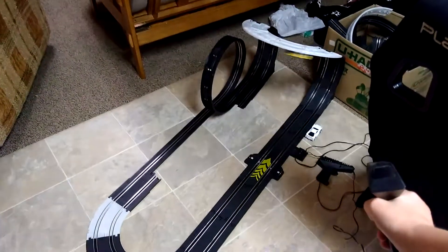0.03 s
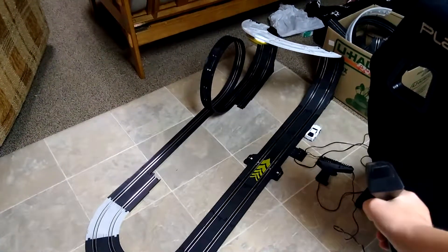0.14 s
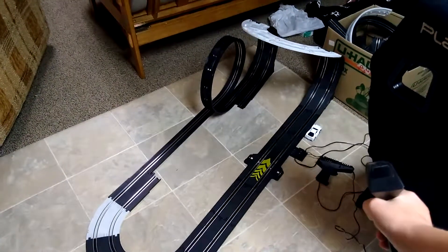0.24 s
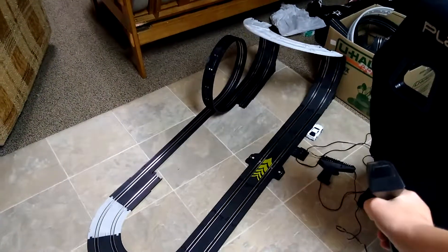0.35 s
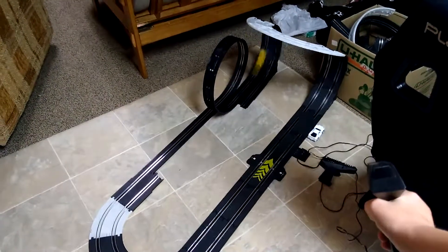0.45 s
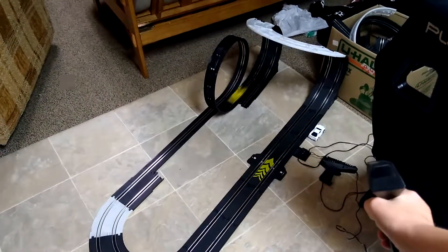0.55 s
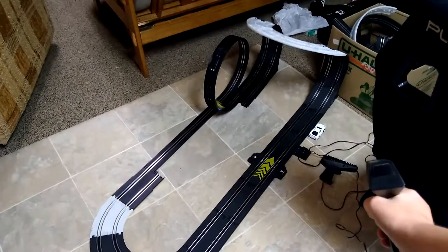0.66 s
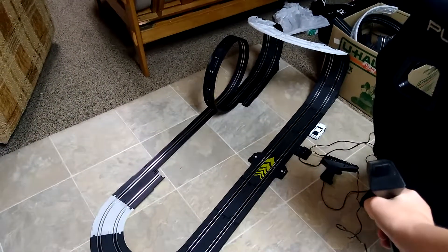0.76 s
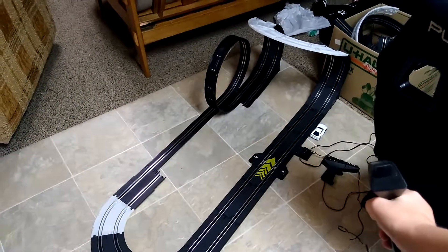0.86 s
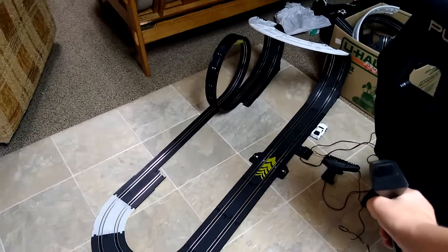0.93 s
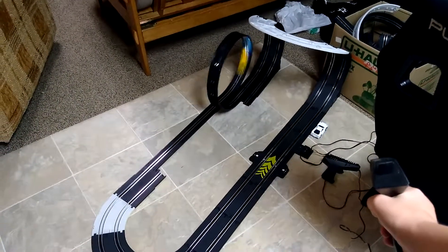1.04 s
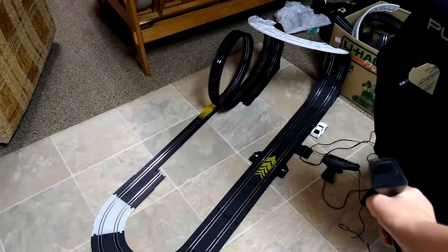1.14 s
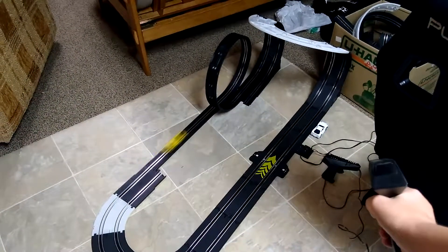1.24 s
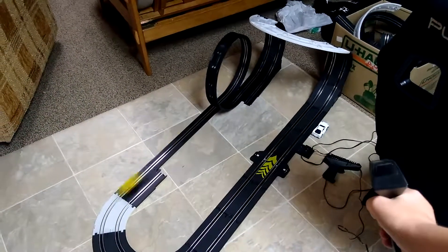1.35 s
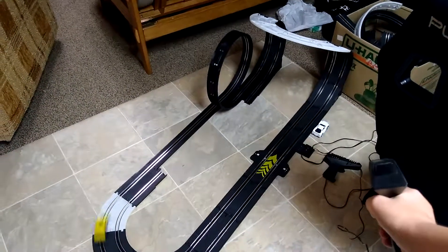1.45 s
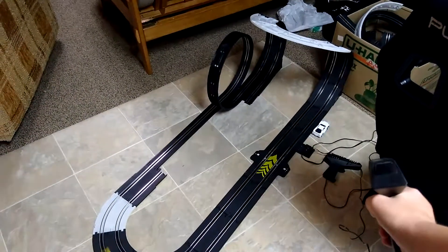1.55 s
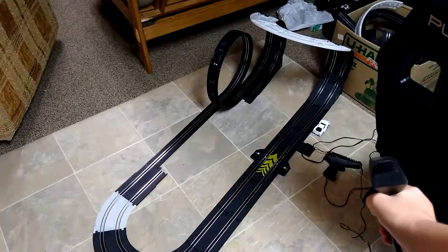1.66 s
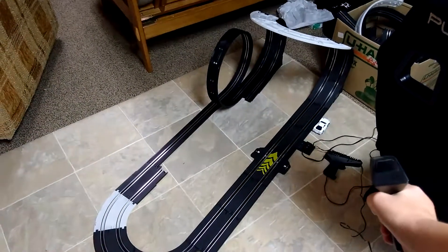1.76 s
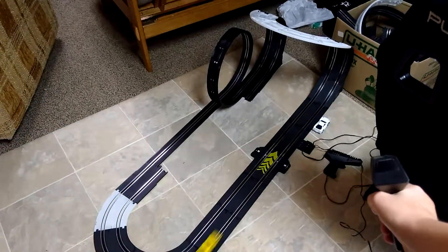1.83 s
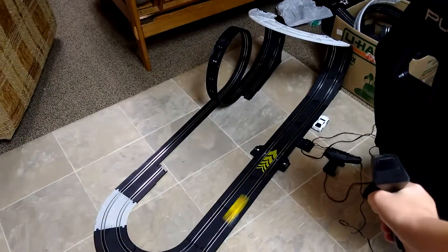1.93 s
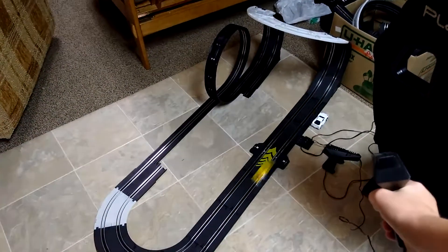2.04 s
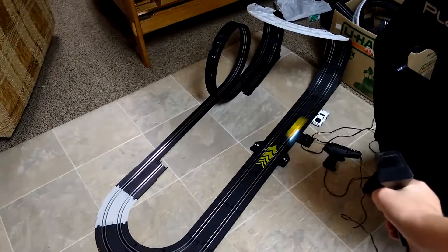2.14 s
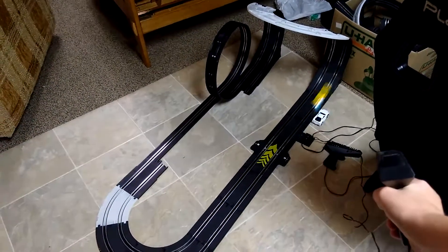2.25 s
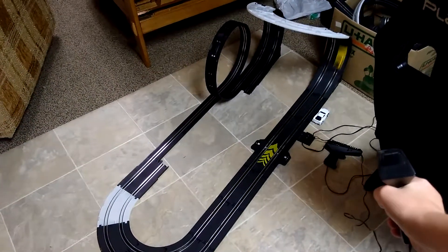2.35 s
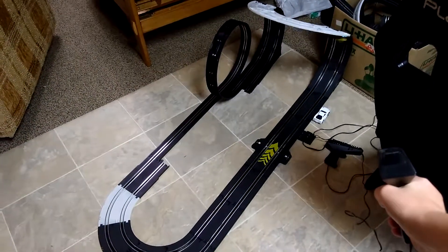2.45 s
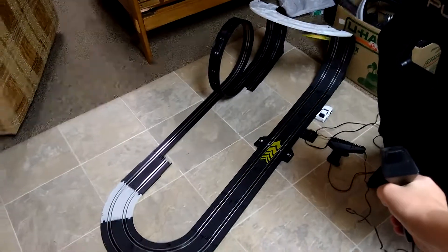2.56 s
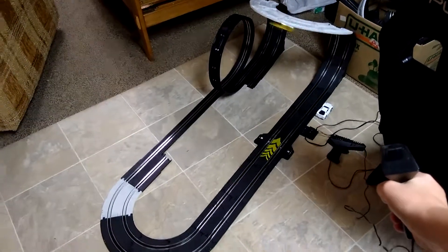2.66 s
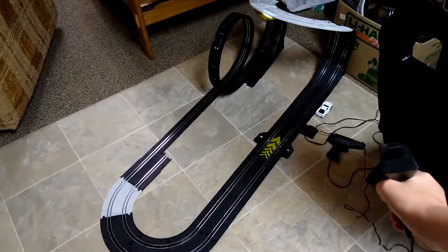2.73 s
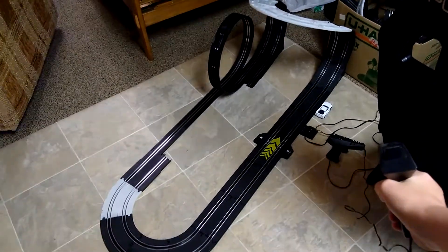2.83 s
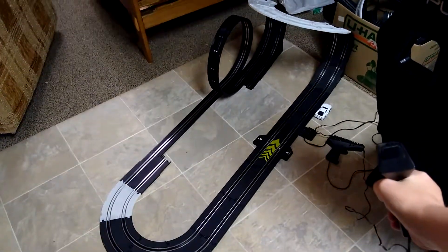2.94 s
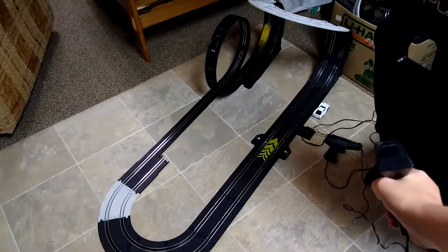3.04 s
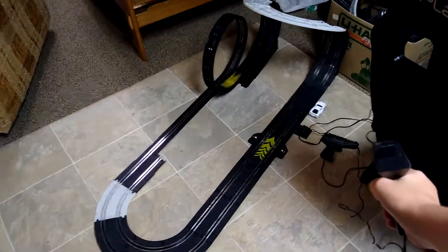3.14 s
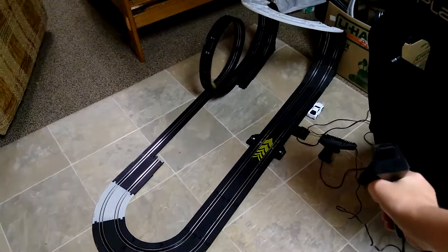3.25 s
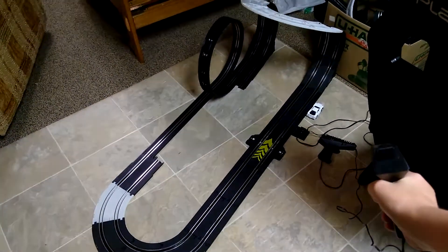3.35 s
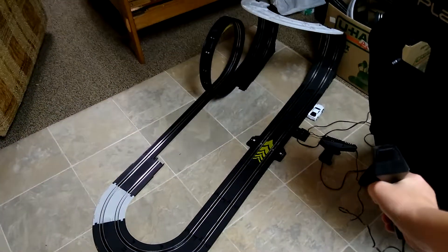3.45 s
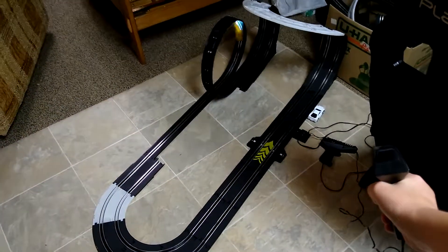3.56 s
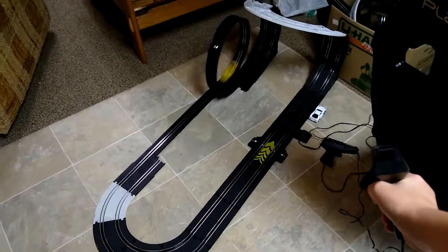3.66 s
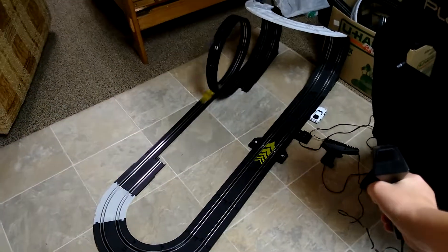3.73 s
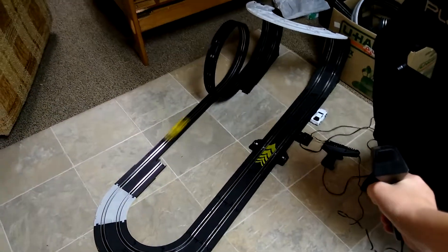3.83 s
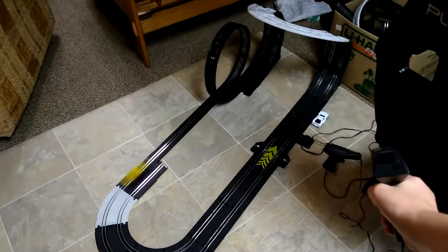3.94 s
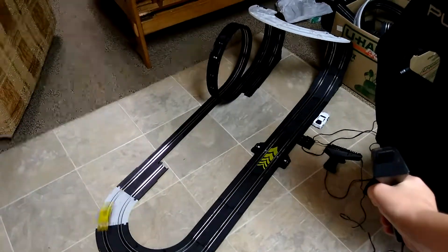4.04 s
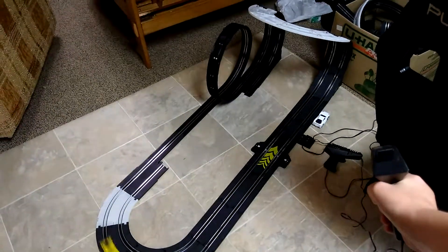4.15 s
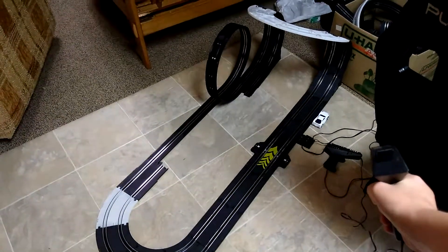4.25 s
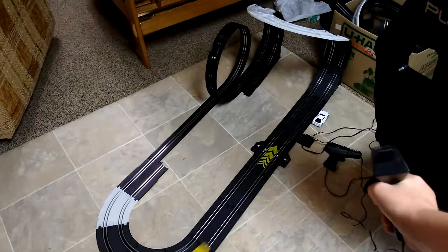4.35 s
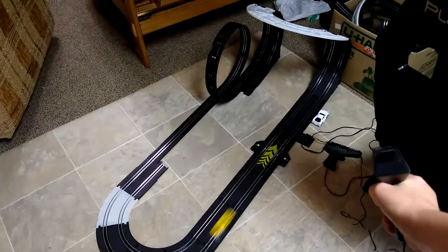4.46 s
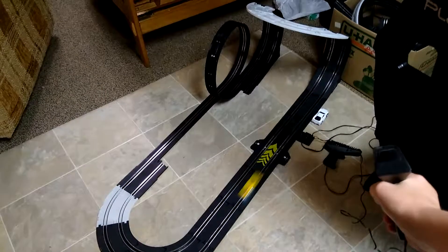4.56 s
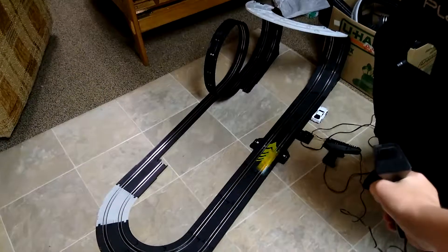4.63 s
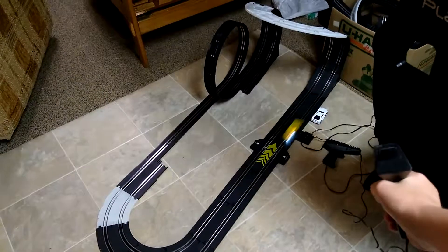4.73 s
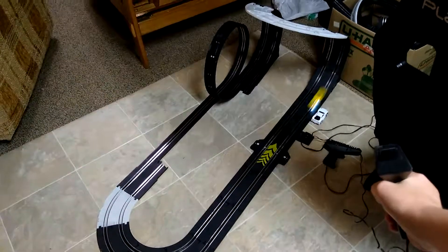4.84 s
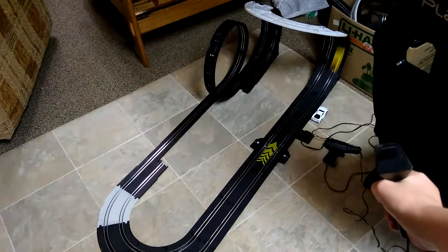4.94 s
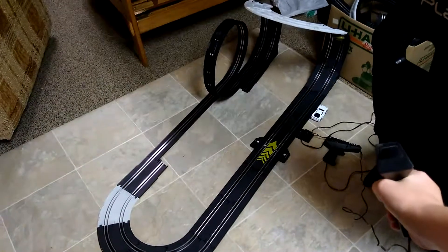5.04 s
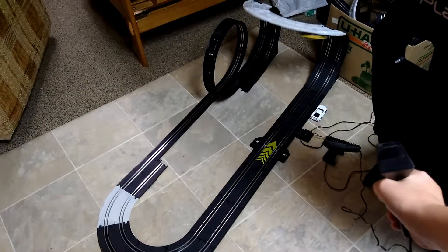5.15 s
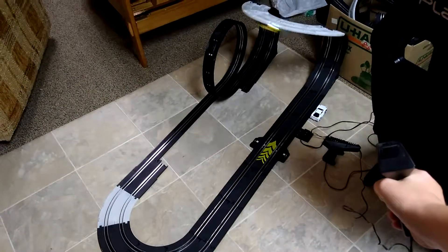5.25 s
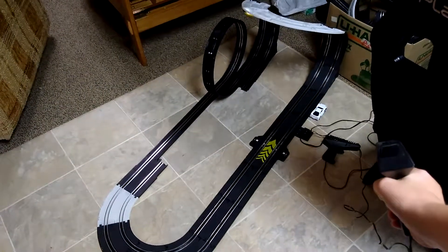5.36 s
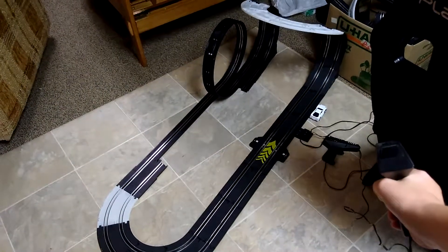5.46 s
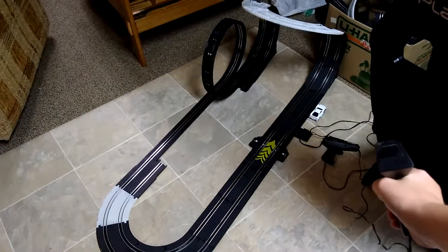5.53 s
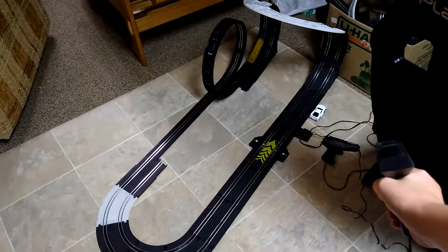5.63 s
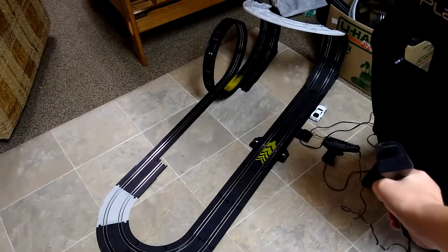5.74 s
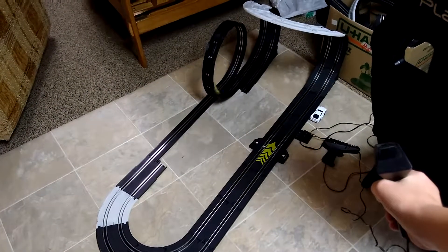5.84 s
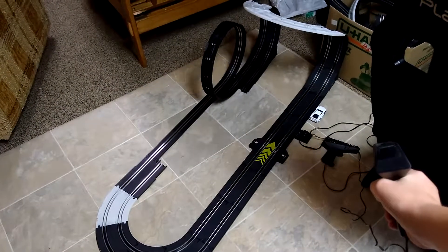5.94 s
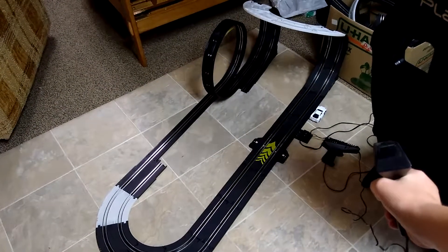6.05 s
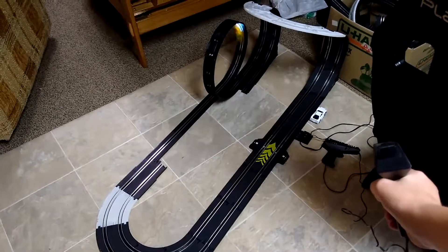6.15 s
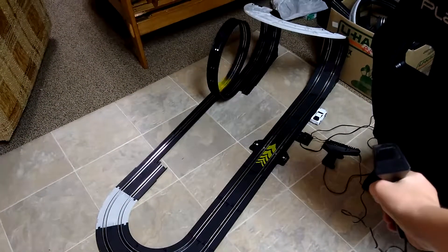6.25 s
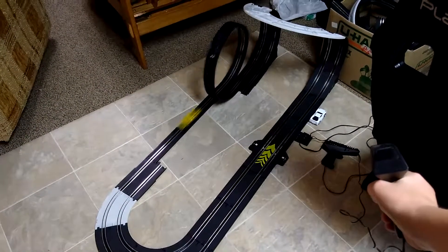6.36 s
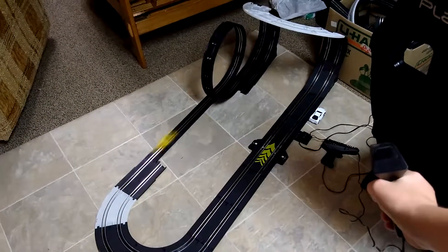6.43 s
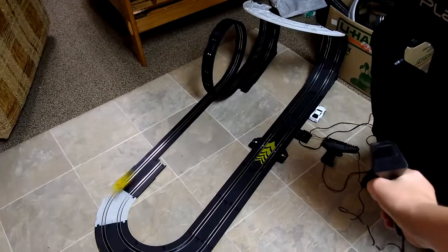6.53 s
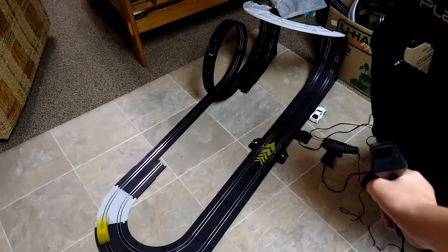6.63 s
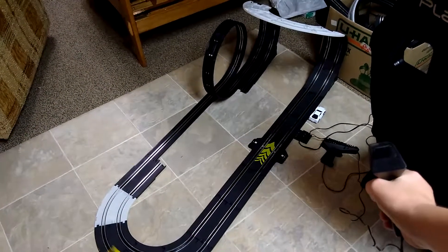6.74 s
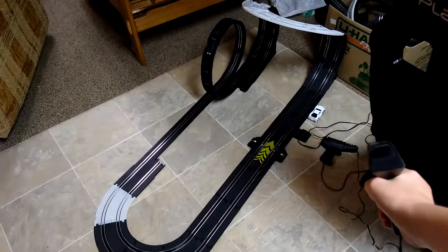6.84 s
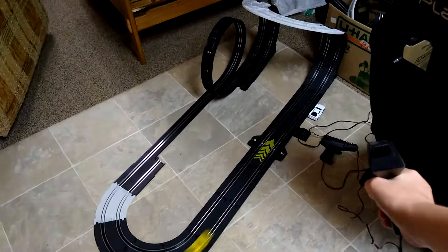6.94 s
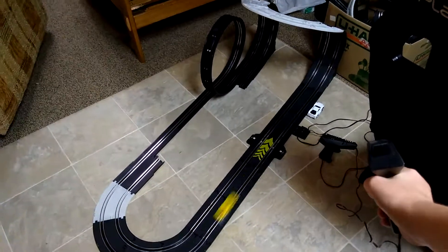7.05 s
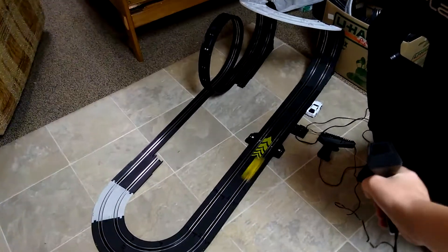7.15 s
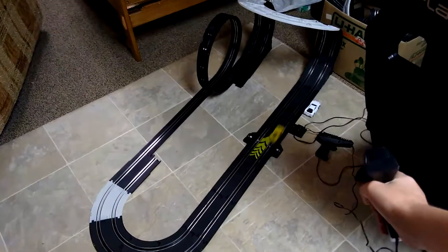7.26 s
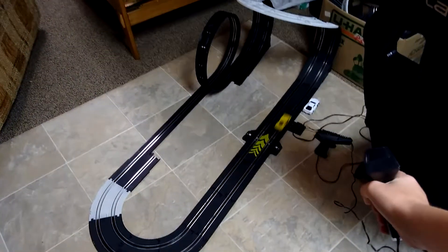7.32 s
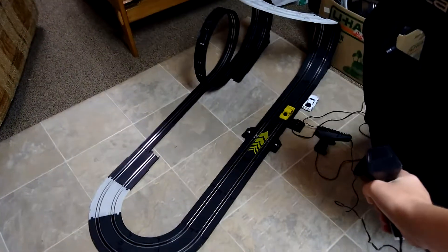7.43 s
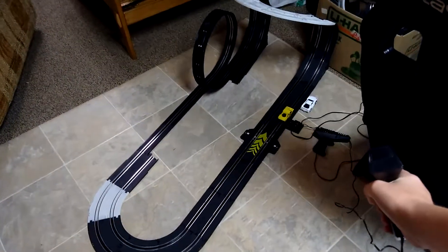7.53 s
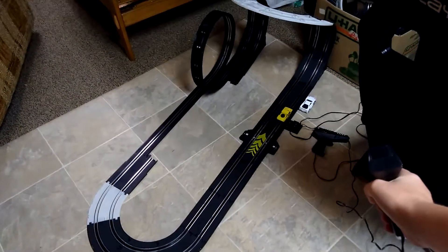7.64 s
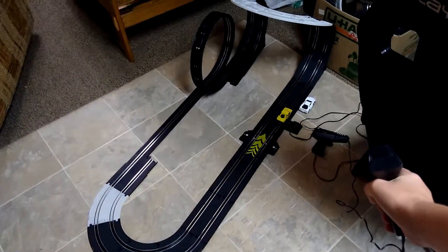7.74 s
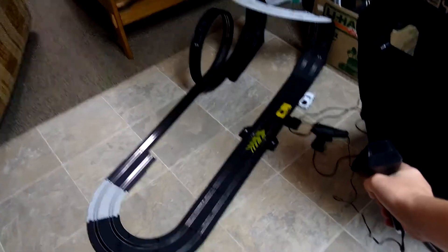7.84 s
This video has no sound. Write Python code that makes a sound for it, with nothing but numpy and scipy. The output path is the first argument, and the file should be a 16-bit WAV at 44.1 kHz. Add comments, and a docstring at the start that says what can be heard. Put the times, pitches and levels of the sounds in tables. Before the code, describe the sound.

Close, wide stereo in a small hard room: a toy car's wheels chatter over plastic track, with buzzing shell, gritty hiss and a thin motor tone. Clusters of dry knocks come and go each lap, getting deeper and fuller as the car nears. Every two and a half seconds it slaps a near piece with a bright clack and scrape. After the third slap the motor sags and everything falls to low hum and soft murmur.

```python
"""In a small tiled room, a toy slot car laps a plastic track close by.
Friction noise drives the resonances of track, chassis and shell; damped tones are the knocks on the joints.
The motor whines, and pick-up braids hiss on the rails as coloured noise. Once a lap the car slaps a
piece close by; at last it coasts to rest. The room answers with decaying noise and hums; in the stereo
picture, left and right differ in phase and level with frequency."""
import sys
import numpy as np
from scipy import signal
from scipy.fft import rfft, irfft, next_fast_len
from scipy.io import wavfile
from scipy.ndimage import uniform_filter1d, map_coordinates

SR = 44100
rng = np.random.default_rng(int(sys.argv[2]) if len(sys.argv) > 2 else 0)


def dump(signal):
    """Clip the signal to [-1, 1] and save it as 16-bit WAV at the path in sys.argv[1]."""
    limited = np.clip(np.atleast_2d(signal).T, -1, 1)
    pcm = np.round(limited * 32767).astype(np.int16)
    wavfile.write(sys.argv[1], SR, pcm)


N = 347949


def car():
    """Structure-borne excitation: one rolling contact shakes track, frame, shell and braids together."""
    flat, raised, chassis, body = shaking()
    piece_hz = per_lap(PIECE_PITCH)[0].clip(500)
    panel_hz = per_lap(PANEL_PITCH)[0].clip(2000)
    chatter = amp(0.57 * wobble(22) + 2.3 * wobble(110) + 1.1 * wobble(400))  # loose wheels
    out = track_rattle(flat, raised, chatter, piece_hz) + frame_grind(chassis, body, chatter)
    out += shell_buzz(body, chatter, panel_hz) + braid_hiss(body, chatter)
    return out + joint_knocks(raised, piece_hz) + shell_ticks(body, panel_hz)


# How each stretch of track shakes the parts, alike every lap, before the offsets below:
# lap_time_s, flat_pieces_db, raised_pieces_db, chassis_db, car_body_db
TRACK_LEVELS = [(.0, -41.5, -42.5, -31.5, -32), (.04, -53.5, -49, -60, -49.5), (.11, -47, -58, -55, -50),
                (.17, -48.5, -39, -53.5, -54), (.2, -44, -41, -52.5, -47), (.44, -52, -42, -55.5, -52.5),
                (.555, -57.5, -48, -69, -58.5), (.595, -51, -45, -55, -52.5), (.68, -56, -43, -64, -55),
                (.86, -53.5, -43, -64, -53.5), (.92, -45, -34, -48, -48), (1.04, -38, -34, -44, -49),
                (1.11, -41, -34, -55, -40), (1.23, -41.5, -40.5, -52, -40.5),
                (1.36, -45.5, -43, -52.5, -43), (1.47, -46, -47.5, -55, -40),
                (1.53, -39, -42, -48.5, -34.5), (1.65, -38.5, -40.5, -43.5, -41),
                (1.78, -42, -39.5, -52.5, -41.5), (1.87, -36.5, -38, -43.5, -46.5),
                (1.96, -41.5, -45.5, -46, -40.5), (2.05, -38.5, -50, -51, -49),
                (2.18, -41, -48, -48.5, -52.5), (2.245, -34.5, -46, -43.5, -46),
                (2.33, -41.5, -39, -47.5, -46), (2.42, -39, -36, -42.5, -57.5),
                (2.5, -35.5, -42, -40.5, -51), (2.565, -33.5, -35.5, -44, -51)]
# Departure from the usual lap: time_s, track_and_chassis_offset_db, car_body_offset_db
DRIVE_OFFSETS = [(0, 3, 0), (.4, -5, -0.5), (.8, -2.5, -1), (1.2, -1.5, 0.5), (1.6, 0.5, 0),
                 (2.0, -2, -8.5), (2.4, -6.5, -5.5), (2.8, -3.5, -1.5), (3.2, -6.5, -2), (3.6, -2, 1),
                 (4.0, -0.5, 1), (4.4, 0, -1.5), (4.8, -2.5, -6), (5.2, -0.5, -1), (5.6, -3, 0.5),
                 (6.0, -6, -1.5), (6.4, -3.5, -1.5), (6.8, 0, -1), (7.2, -1.5, -1.5)]
STOP_S, STOP_DB_PER_S = 7.24, 265  # the car coasts to rest: start, fall in level


def shaking():
    """Position-dependent excitation: levels in dB of flat pieces, raised pieces, chassis and car body."""
    flat, raised, chassis, body = per_lap(TRACK_LEVELS)
    s, track_db, body_db = np.transpose(DRIVE_OFFSETS)
    t = np.arange(N) / SR
    rest = -STOP_DB_PER_S * (t - STOP_S).clip(0)
    track_db = np.interp(t, s, track_db) + rest
    body_db = np.interp(t, s, body_db) + rest
    return flat + track_db, raised + track_db, chassis + track_db, body + body_db


# Resonances of flat and of raised track pieces: pitch_hz, width_hz, level_db
FLAT_MODES = [(429, 63, -6), (548.7, 42, -0.5), (634, 40, -1), (701.5, 13, -4.5), (756, 51, -6.5)]
RAISED_MODES = [(718, 33, -5.5), (806, 30, -3.5), (853, 44, -3), (920, 82, -10), (1058, 34, -6.5),
                (1202, 46, -1.5), (1280, 69, -5), (1386, 83, 0)]
# Pitch of the raised piece under the car: lap_time_s, pitch_hz
PIECE_PITCH = [(.07, 1140), (.25, 1000), (.8, 894), (.87, 1060), (1.2, 1035), (1.29, 967), (1.45, 1130),
               (1.9, 1203), (1.99, 767), (2.4, 733)]


def track_rattle(flat, raised, chatter, piece_hz):
    """Forced plate vibration: wheels excite the track's modes, in raised pieces mostly near their pitch."""
    rattle = rolled(amp(flat - 4.0), FLAT_MODES, chatter, own_db=3.5)
    return rattle + rolled(amp(raised - 3), RAISED_MODES, chatter, own_db=2, focus_hz=piece_hz, spread=0.24)


# Resonances of the chassis and of the axles: pitch_hz, width_hz, level_db
CHASSIS_MODES = [(1365, 87, -0.61), (1498, 44, 0.12), (1603, 35, -0.32), (1744, 63, 1.7), (1998, 130, 1)]
AXLE_MODES = [(2110, 110, -9), (2350, 120, -6.5), (2560, 130, -7), (2750, 130, -9)]
AXLE_BODY_DB, AXLE_FRAME_DB = -4, -5  # axle drive relative to car body and to chassis


def frame_grind(chassis, body, chatter):
    """Coupled vibration: the axles grind with body and chassis, whose incoherent powers add."""
    axle_force = np.hypot(amp(body + AXLE_BODY_DB), amp(chassis + AXLE_FRAME_DB))
    frame = rolled(amp(chassis), CHASSIS_MODES, chatter, own_db=3)
    return frame + rolled(axle_force, AXLE_MODES, chatter, own_db=3)


# Resonances of the shell: pitch_hz, width_hz, level_db
SHELL_MODES = [(2893, 46, -4.5), (3093, 66, -11), (3420, 144, -5), (3724, 260, -10.5), (4160, 91, -9.5),
               (4517, 120, -3)]
# Pitch of the part of the shell that buzzes most: lap_time_s, pitch_hz
PANEL_PITCH = [(.1, 3446), (.6, 3580), (.7, 4150), (.86, 3392), (1.2, 3320), (1.7, 3524), (2.02, 4250),
               (2.17, 3780), (2.28, 4440), (2.36, 4400), (2.43, 3170)]


def shell_buzz(body, chatter, panel_hz):
    """Panel resonance: the modes nearest the most active part of the shell respond most."""
    return rolled(amp(body + 2.5), SHELL_MODES, chatter, own_db=3.5, focus_hz=panel_hz, spread=0.17)


# Spectrum of the braids on the rails: frequency_hz, density_db (per Hz)
BRAID_SPECTRUM = [(2500, -13), (4500, -24.5), (5200, 1), (6500, 0.5), (8500, 3.5), (11000, 4), (13000, 4),
                  (15400, -4), (15650, -17.5)]
SKID_DB, SKID_S = -35.5, 0.094  # hiss after each slap; its envelope's decay reaches 34 dB after this time


def braid_hiss(body, chatter):
    """Sliding friction: broadband noise follows the car body and flares after each slap."""
    skid = after_slaps(lambda t: amp(SKID_DB - 34 * (t / SKID_S) ** 2) * (t / 0.015).clip(0, 1))
    friction = unit(chatter ** 0.5 * amp(2.03 * wobble(45)) * rng.standard_normal(N))
    return coloured((amp(body + 2.5) + skid) * friction, BRAID_SPECTRUM)


# Knocks on joints, levels before each part's offset: start_s, level_db, pitch_hz
JOINT_KNOCKS = [(0.19, -27, 952), (0.368, -32.5, 810), (0.395, -26, 1240), (0.453, -26, 854),
                (0.482, -27.5, 1280), (0.505, -19.5, 1055), (0.533, -21.5, 1068), (0.571, -21, 1070),
                (0.596, -37, 1140), (0.692, -30, 820), (0.992, -26, 1204), (1.012, -28, 1186),
                (1.063, -25.5, 1090), (1.076, -26, 604), (1.088, -26.5, 1255), (1.119, -19.5, 625),
                (1.222, -28.5, 1217), (1.244, -27.5, 1270), (1.264, -17.5, 570), (1.299, -29, 1266),
                (1.326, -24, 1198), (1.363, -30.5, 1310), (1.405, -20, 536), (1.471, -23.5, 652),
                (1.503, -28.5, 654), (1.524, -30, 700), (1.553, -32, 640), (1.604, -28.5, 575),
                (1.64, -25, 683), (1.727, -21.5, 598), (1.747, -22.5, 627), (1.806, -27.5, 1504),
                (1.944, -26, 564), (2.006, -23.5, 565), (2.035, -20.5, 558), (2.052, -23.5, 533),
                (2.254, -27, 785), (2.307, -37, 1124), (2.663, -29.5, 1026), (2.693, -33, 1017),
                (2.745, -33, 1010), (2.977, -27.5, 1007), (2.992, -28.5, 1010), (3.007, -36, 1120),
                (3.032, -31, 1060), (3.063, -24.5, 1095), (3.087, -25, 1204), (3.124, -22.5, 1054),
                (3.142, -23.5, 1050), (3.162, -30, 1095), (3.181, -30, 1078), (3.203, -30, 1025),
                (3.224, -38.5, 990), (3.257, -34, 1070), (3.473, -34, 622), (3.567, -29, 1206),
                (3.649, -21, 594), (3.691, -25.5, 684), (3.703, -20.5, 643), (3.825, -23.5, 560),
                (3.847, -21.5, 580), (3.915, -24, 1345), (3.954, -31.5, 713), (3.967, -23, 1050),
                (3.992, -25, 693), (4.047, -22.5, 690), (4.068, -28, 700), (4.088, -31.5, 643),
                (4.197, -26, 506), (4.257, -26, 672), (4.325, -22, 677), (4.397, -25.5, 1450),
                (4.432, -21.5, 714), (4.507, -26, 1500), (4.533, -28, 1540), (4.562, -25.5, 950),
                (4.586, -23.5, 546), (4.615, -25.5, 600), (4.835, -23.5, 1090), (4.859, -27, 1062),
                (4.878, -29, 1090), (4.917, -30, 1190), (4.954, -34.5, 1050), (4.979, -26.5, 1086),
                (5.263, -29, 890), (5.476, -31, 908), (5.557, -25.5, 1080), (5.575, -27, 1066),
                (5.611, -25, 1090), (5.643, -29, 1100), (5.665, -24.5, 1304), (5.675, -21.5, 1070),
                (5.712, -26, 1086), (5.728, -20, 1060), (5.741, -25, 1104), (5.791, -22.5, 1086),
                (5.838, -27, 1210), (5.951, -27.5, 630), (6.136, -26.5, 1060), (6.204, -35, 590),
                (6.225, -25.5, 618), (6.265, -25, 1485), (6.28, -23, 600), (6.296, -25, 622),
                (6.401, -23.5, 562), (6.422, -20, 586), (6.464, -28.5, 650), (6.483, -28, 1200),
                (6.498, -28, 636), (6.56, -27, 1265), (6.717, -27.5, 654), (6.877, -24, 564),
                (6.89, -21, 556), (6.984, -28, 786), (7.027, -25, 1483), (7.054, -24.5, 1666),
                (7.109, -26, 1260), (7.142, -18, 1370), (7.158, -22, 560), (7.172, -26, 696)]
# Spectrum of scraping contact: frequency_hz, density_db (per Hz)
SCRAPE_SPECTRUM = [(500, -7), (1500, 6), (3000, 12), (5000, 17), (8000, -13.5), (11000, 12.5), (15500, -7)]
# Resonances of a struck piece: pitch_hz, width_hz, level_db
STRUCK_MODES = [(760, 370, -1), (1460, 650, 2.5), (2250, 380, 13.5), (3020, 340, 8.5), (4410, 490, -12.5),
                (10300, 6300, -11.5)]
HOLD_S = .012  # a knocked piece rings freely until the wheel behind damps it


def joint_knocks(raised, piece_hz):
    """Impact excitation: each axle rings the piece, with a thump, a scrape and a dry click."""
    s, db, hz = np.transpose(JOINT_KNOCKS)
    front = rings(s, db - 6.5, hz, t60=0.028, rough=0.078, hold=HOLD_S)
    rear = rings(s + .01, db - 8.5, 0.852 * hz, t60=0.03, rough=0.09)
    thump = rings(s, db - 13.0, .65 * hz, t60=0.044, rough=0.067)  # the piece on the tiles
    scrape = coloured(bursts(s, db - 25, t60=0.03), SCRAPE_SPECTRUM)
    click = ringing(bursts(s, db - 1, t60=.005), STRUCK_MODES)
    small = rings(*strays(raised + 4, piece_hz, count=60), t60=0.017, rough=0.038)
    return front + rear + thump + scrape + click + small


# Ticks of the shell: start_s, level_db, edge_level_db (edge relative to the tick)
SHELL_TICKS = [(0.3668, -29, -23), (0.394, -27, -9), (0.482, -29.5, -14.5), (0.507, -28, -19),
               (0.5648, -31, 0), (0.6557, -27, -9), (0.792, -25, -13), (0.829, -28, -8.5),
               (0.9924, -33, 16.5), (1.0144, -32.5, -8), (1.075, -27, 3), (1.265, -32, 3),
               (1.2979, -31.5, 0), (1.456, -31, -8), (1.727, -41.5, -13), (2.009, -38, 1),
               (2.07, -38, -12.5), (2.33, -37.5, -21), (2.9447, -38, -20), (3.0848, -30, -11.5),
               (3.126, -42, 0), (3.2256, -32.5, 0.5), (3.4506, -25, -15), (3.5698, -33.5, 4),
               (3.6885, -26.5, -11.5), (3.7668, -36, 1), (4.659, -20, -26), (4.837, -39, -1),
               (4.8595, -33, -6), (5.0444, -34, -13), (5.477, -30, -17), (5.552, -28, -7),
               (5.756, -40.5, 1), (5.9449, -31.5, -0.5), (5.979, -19, -9.5), (6.112, -39.5, 16),
               (6.1686, -24, -1), (6.204, -34.5, -7), (6.2256, -26, -2), (6.2756, -29, -2.5),
               (6.584, -33, -7.5), (7.106, -30.5, -16.5), (7.1422, -28, -12)]


def shell_ticks(body, panel_hz):
    """Damped free vibration: the shell taps its posts and rings, each scheduled tap with a noisy edge."""
    s, db, edge_db = np.transpose(SHELL_TICKS)
    ticks = rings(s, db, panel_hz[(s * SR).astype(int)], t60=0.049, rough=0.13)
    ticks += rings(*strays(body + 8, panel_hz, count=60), t60=0.094, rough=0.071)
    return ticks + coloured(bursts(s, db + edge_db, t60=0.011), BRAID_SPECTRUM)


# Slaps on the near piece, levels before each part's offset: start_s, ring_db, scrape_db, rebound_delay_s,
# ring_pitch_hz, ring_duration_s, blow_db (relative to the ring)
NEAR_SLAPS = [(2.071, -20, -12, 0.025, 1620, 0.0067, 0), (4.658, -21.5, -5, 0.017, 1540, 0.0095, 8),
              (7.213, -17, -13, 0.029, 1498, 0.0093, 0.5)]


def slaps():
    """Impact and damping: the piece rings and scrapes at once, rear wheels land and crack, a rebound scrapes."""
    s, db, scrape_db, rebound, ring_hz, ring_s, blow_db = np.transpose(NEAR_SLAPS)
    landing = s + ring_s
    second = s + rebound
    t = np.arange(N) / SR - (s[:, None] - .0006)
    decay_db = -150 * t.clip(0) - 9000 * (t - ring_s[:, None]).clip(0, .02)  # slow, then damped by the wheels
    held = (t / 0.00095).clip(0, 1) * amp(decay_db) * (t < .03)
    phase = 2 * np.pi * ring_hz[:, None] * t + .04 * np.cumsum(rng.standard_normal(N))
    tone = np.sin(phase) + amp(-8) * np.sin(2 * phase + 1)  # with an octave overtone
    clack = amp(db) @ (held * amp(1.7 * wobble(250)) * tone)
    blows = bursts(s, db + blow_db, t60=0.041)
    blows += bursts(landing, db + scrape_db + 11.5, t60=0.025)
    blows += bursts(second, db + scrape_db + 7.0, t60=0.17)
    crack = bursts(landing - .001, db - 0.5, t60=0.009) + bursts(second + 0.0054, db - 1.5, t60=0.0063)
    crack = ringing(crack, [(11800, 2300, 0)])
    scrape = bursts(s + 0.0022, db + scrape_db + 5.0, t60=0.19) + bursts(second, db + scrape_db, t60=0.15)
    scrape *= amp(4.0 * wobble(140) + 1.7 * wobble(500))  # the braids skip
    return clack + ringing(blows, STRUCK_MODES) + crack + coloured(scrape, SCRAPE_SPECTRUM)


# The motor's gear note, before its random wobble: lap_time_s, pitch_hz, level_db
GEAR_NOTE = [(.05, 1020, -60), (.12, 1072, -43), (.2, 1099, -40.5), (.34, 1144, -46.5), (.45, 962.6, -45),
             (.56, 995.7, -55.5), (.62, 1031, -42), (.72, 962, -50), (.84, 1003, -54.5), (1.0, 1060, -40),
             (1.2, 1059, -45), (1.4, 1080, -52), (1.55, 1107, -41), (1.75, 1197, -47.5),
             (1.88, 1081, -46.5), (1.98, 956.7, -47.5), (2.1, 776.8, -49.5), (2.25, 841, -41.5),
             (2.4, 882, -47), (2.52, 949.4, -40)]
COAST_HZ, COAST_S, COAST_DB = 714, 0.2, -41.5  # unpowered motor: start pitch, time to sag by 1/e, start level


def whine():
    """Gear-mesh tone: pitch follows motor speed, with random frequency and amplitude modulation."""
    hz, db = per_lap(GEAR_NOTE)
    coasting = (np.arange(N) / SR - STOP_S).clip(0)
    hz = np.where(coasting > 0, COAST_HZ * np.exp(-coasting / COAST_S), hz)
    db = np.where(coasting > 0, COAST_DB - STOP_DB_PER_S * coasting, db)
    step = 2 * np.pi * hz * (1 + 0.02018 * wobble(25)) / SR
    phase = np.cumsum(step + .09 * rng.standard_normal(N))  # roughness in radians a sample
    return amp(db + 2.5 * wobble(60)) * np.sin(phase)


# Reverberation time: frequency_hz, t60_s
DECAY_TIMES = [(200, 0.17), (2000, 0.28), (12000, 0.27)]
# Colour of the answer at its start: frequency_hz, level_db
ANSWER_COLOUR = [(300, -2.5), (3000, -2.5), (9000, 4)]
# Share of the answer that is in the right channel only: frequency_hz, share
UNLIKE_SHARE = [(300, 0.93), (1000, 0.2), (2150, .03), (2850, .03), (3700, .6), (4750, .1), (5250, .1),
                (6000, .7), (8000, 1)]
ROOM_STEP_S = .2  # the moving car meets a new answer this often


def room(x):
    """Reverberation: noise tails decay at each frequency's own rate, partly decorrelated left to right."""
    step = int(ROOM_STEP_S * SR)
    x = np.pad(x, (step, 2 * step))
    out = np.zeros((2, N + 3 * SR))
    fade = np.sin(np.pi * np.arange(2 * step) / (2 * step))  # overlapping pieces keep their power
    for start in range(0, N + step, step):
        hz, t, z = signal.stft(rng.standard_normal((2, SR // 2)), SR, nperseg=256)
        unlike = np.clip(along(UNLIKE_SHARE, hz), 0, 1)[:, None]
        z = np.array([z[0], np.sqrt(1 - unlike ** 2) * z[0] + unlike * z[1]])
        decay_db = along(ANSWER_COLOUR, hz)[:, None] - 60 * t / along(DECAY_TIMES, hz)[:, None]
        tail = signal.istft(z * amp(decay_db), SR, nperseg=256)[1]
        piece = (fade * x[start:start + 2 * step])[None]
        answer = signal.fftconvolve(piece, tail / np.linalg.norm(tail[0]), axes=1)
        out[:, start + 300:][:, :answer.shape[1]] += answer  # first wall after 7 ms
    return out[:, step:step + N]


# Spectra of the low rumble and the faint murmur: frequency_hz, density_db (per Hz)
RUMBLE_SPECTRUM = [(20, -53), (45, -31), (100, -3), (180, -0.5), (240, 1), (310, -22.5), (450, -22),
                   (900, -58)]
MURMUR_SPECTRUM = [(250, 0), (450, -4), (740, -2.5), (1000, -9.5), (1500, -13), (3000, -17.5),
                   (4500, -26.5), (9000, -31)]
# Hollow notes in the murmur, and a note in the rumble: pitch_hz, width_hz, level_db
HOLLOW_MODES = [(354.5, 20, 3.5), (441, 31, 2.5), (738, 12, 9), (798, 20, 4), (950, 20, 3)]
DRONE_MODE = [(172, 12, 0)]
# The murmur dips, then swells once the car rests: time_s, level_db
MURMUR_LEVEL = [(0, -59.5), (7.2, -58), (7.3, -74), (7.4, -64), (7.6, -57.5), (7.89, -53)]
# The floor drums as the car nears: lap_time_s, level_db
FLOOR_LEVEL = [(.0, -53.5), (.05, -85), (.9, -69), (1.1, -55.5), (1.5, -51), (1.9, -50.5), (2.15, -46.5),
               (2.35, -46), (2.56, -46)]
HUM_DB, DIP_DB, DIP_S = -54, 15.5, 0.22  # steady rumble; its dip after a slap, recovery by 1/e


def room_tone():
    """Ambient noise field: partly coherent rumble, resonant murmur and hiss independent left and right."""
    hum = amp(HUM_DB - after_slaps(lambda t: DIP_DB * np.exp(-t / DIP_S)))
    drumming = amp(per_lap(FLOOR_LEVEL)[0]) * (np.arange(N) / SR < STOP_S)
    level = np.hypot(hum, drumming)
    rumble = level * amp(2 * wobble(4) + 2.0 * wobble(13))
    rumble = rumble * coloured(rng.standard_normal((3, N)), RUMBLE_SPECTRUM)
    drone = level * amp(-5) * ringing(rng.standard_normal(N), DRONE_MODE)
    murmur = coloured(rng.standard_normal(N), MURMUR_SPECTRUM) + ringing(rng.standard_normal(N), HOLLOW_MODES)
    murmur = amp(curves(MURMUR_LEVEL)[0]) * murmur
    hiss = amp(-72.5) * rng.standard_normal((2, N))
    return 0.83 * rumble[:2] + 0.82 * rumble[2] + drone + murmur + hiss  # own and shared rumble


GRIT_PER_S = 900  # specks that the wheels strike


def rolled(force, modes, shake, own_db, focus_hz=None, spread=.2):
    """Rolling excitation: uneven friction noise and specks drive each mode, most near focus_hz if given."""
    out = 0
    for hz, width, db in modes:
        near = 1 if focus_hz is None else np.exp(-.5 * (np.log(hz / focus_hz) / spread) ** 2)
        specks = unit((rng.random(N) < GRIT_PER_S / SR) * rng.laplace(size=N))
        grit = unit(shake * amp(own_db * wobble(25)) * (rng.standard_normal(N) + specks))  # equal strengths
        out = out + amp(db) * ringing(force * near * grit, [(hz, width, 0)])
    return out


def rings(times, dbs, hzs, t60, rough, hold=0):
    """Damped oscillation: one slightly rough tone for each knock, decaying after the hold."""
    out, t = np.zeros(N + SR), np.arange(SR // 8) / SR
    for s, db, hz in zip(times, dbs, hzs):
        drift = rough * np.cumsum(rng.standard_normal(len(t)))
        envelope = amp(db - 60 * (t - hold).clip(0) / t60) * (1 - np.exp(-t / 0.00064))
        out[round(s * SR):][:len(t)] += envelope * np.sin(2 * np.pi * hz * t + drift)
    return out[:N]


def bursts(times, dbs, t60):
    """Impulsive noise: puffs start hard and die away exponentially."""
    marks = np.zeros(N)
    marks[np.round(np.multiply(times, SR)).astype(int)] = amp(dbs)
    t = np.arange(SR // 2) / SR
    return signal.fftconvolve(marks, amp(-60 * t / t60))[:N] * rng.standard_normal(N)


def strays(level_db, pitch_hz, count):
    """Random impacts: times, dB and Hz of small blows at chance moments."""
    when, size, bend = rng.random((count, 3)).T
    i = (when * (N - 1)).astype(int)
    return i / SR, level_db[i] - 12 * size, pitch_hz[i] * (1 + 0.17 * (bend - .5))


FIRST_LAP_S, LAP_S = -.515, 2.58  # start of the lap under way, nominal lap; each slap starts a new one


def per_lap(rows):
    """Periodicity: columns given for one lap, repeated and stretched to each lap's length."""
    starts = [FIRST_LAP_S] + [row[0] for row in NEAR_SLAPS]
    starts.append(starts[-1] + LAP_S)
    into = LAP_S * np.interp(np.arange(N) / SR, starts, np.arange(len(starts)))
    s, *cols = np.transpose(rows)
    return [np.interp(into, s, c, period=LAP_S) for c in cols]


def after_slaps(shape):
    """Superposition: a shape of the time since the slap, laid after each one."""
    since = np.arange(N) / SR - np.array(NEAR_SLAPS)[:, :1]
    return np.sum((since > 0) * shape(since.clip(0)), axis=0)


def curves(rows):
    """Linear interpolation: one value per sample for each column after the time."""
    s, *cols = np.transpose(rows)
    return [np.interp(np.arange(N) / SR, s, c, right=-120) for c in cols]


def wobble(rate):
    """Slow random modulation: a smooth curve with rate knots a second."""
    return map_coordinates(rng.standard_normal(int(N * rate / SR) + 4), [np.arange(N) * rate / SR])


def ringing(x, modes):
    """Modal superposition: causal resonances, scaled so that white noise keeps its level."""
    def body(f):
        total = 0
        for k, (c, w, db) in enumerate(modes):
            total = total + (-1) ** k * amp(db) * 1j * f * w / (c * c - f * f + 1j * f * w)
        return total
    return filtered(x, body) / np.sqrt(np.mean(np.abs(body(np.linspace(0, SR / 2, 4096))) ** 2))


def coloured(x, spectrum):
    """Spectral shaping: a gain curve, scaled so that white noise keeps its level."""
    gain = lambda hz: amp(along(spectrum, hz))
    return filtered(x, gain) / np.sqrt(np.mean(gain(np.linspace(0, SR / 2, 4096)) ** 2))


def filtered(x, response):
    """Linear filtering: x times a complex response of frequency."""
    m = next_fast_len(N + SR // 2)
    return irfft(rfft(x, m) * response(np.fft.rfftfreq(m, 1 / SR)), m)[..., :N]


def along(points, hz):
    """Logarithmic frequency scale: (Hz, value) points interpolated on a log axis."""
    f, v = np.transpose(points)
    return np.interp(np.log(hz + 1), np.log(f + 1), v)


def amp(db):
    """Decibel law: amplitude ratio of a level."""
    return 10 ** (np.asarray(db) / 20)


def unit(x):
    """Normalisation: x scaled to an rms of one."""
    return x / np.sqrt(np.mean(np.abs(x) ** 2) + 1e-20)


def scene():
    """Superposition: direct sound, the room's answer and the background add."""
    toy = car() + whine()
    slap = slaps()
    answer = room(toy + amp(-7) * slap)  # the near slap excites the room less
    return toy + slap + amp(-4.0) * answer + room_tone()


# Left-right phase: frequency_hz, half_phase_half_turns (half the difference), sign_bias (-1..1)
STEREO_PHASE = [(150, .38, .3), (400, .13, .9), (800, .11, .9), (1150, 0, .9), (1750, -.3, 0),
                (2200, -.46, -.5), (2370, -.5, -.5), (2650, -.5, -.5), (3150, -.75, -.6), (3550, -.92, -.6),
                (3780, -1, -.6), (4350, -1.2, -.3), (4850, -1.5, 0), (5150, -1.5, 0), (6050, -2, .6),
                (7400, -2.5, .9), (8500, -3, .9), (9600, -3.5, .8), (10800, -3.75, 0), (12200, -3.7, 0),
                (13100, -3.5, .7), (14150, -3, .8), (15300, -2.5, .8)]
# Level of the left channel over the right: frequency_hz, difference_db
STEREO_TILT = [(60, -4), (110, -3.5), (200, -.5), (1000, 0), (1700, -4.5), (2300, 0), (2600, 0),
               (3100, 1.5), (4000, 0), (5300, 0), (7500, -2.5), (11500, -6.5), (15500, -3)]
TOP_HZ, CLIP = 15800, .3  # band limit; amplitude toward which the loudest blows are squashed
WANDER = .03  # scale of the random slide of the phase pattern, as a share of frequency


def record(dry):
    """Stereo widening: squashed peaks, then left-right phase and level by frequency, then a band limit."""
    squashed = dry / (1 + (dry / CLIP) ** 4) ** .25
    hz, _, z = signal.stft(squashed, SR, nperseg=512)
    f, turn, bias = np.transpose(STEREO_PHASE)
    slide = wobble(6)[np.minimum(256 * np.arange(z.shape[2]), N - 1)]
    half = np.pi * np.interp(hz[:, None] * (1 + WANDER * slide), f, turn)
    # random sign of the left-right phase, smoothed over frequency and time
    patches = uniform_filter1d(rng.standard_normal(z.shape[1:]), size=5, axis=0)
    drift = unit(uniform_filter1d(patches, size=9, axis=1))
    sign_angle = np.pi / 2 * np.tanh(3 * (drift + 2.44 * np.interp(hz, f, bias)[:, None]))
    apart = np.sin(half) * np.exp(1j * sign_angle)
    tilt = amp(along(STEREO_TILT, hz) / 2)[:, None]
    stereo = z * [(np.cos(half) + apart) * tilt, (np.cos(half) - apart) / tilt]
    wide = signal.istft(stereo, SR, nperseg=512)[1][:, :N]
    return filtered(wide, lambda hz: (hz < TOP_HZ) / (1 + (50 / (hz + 1)) ** 4))  # deep bass is cut too


dry = scene()
out = record(dry)
dump(out)
```